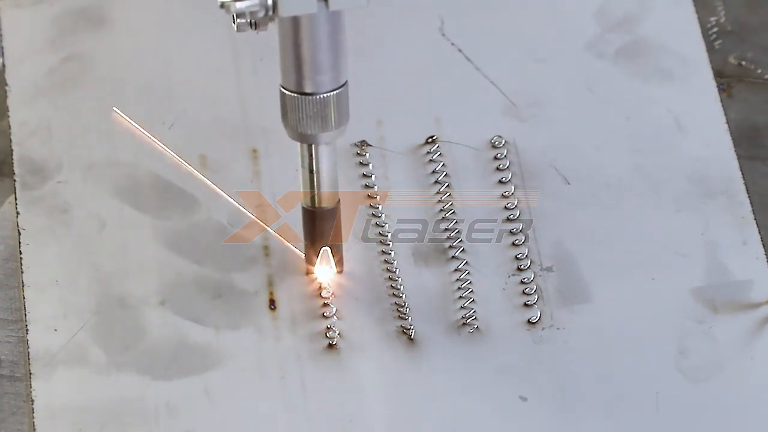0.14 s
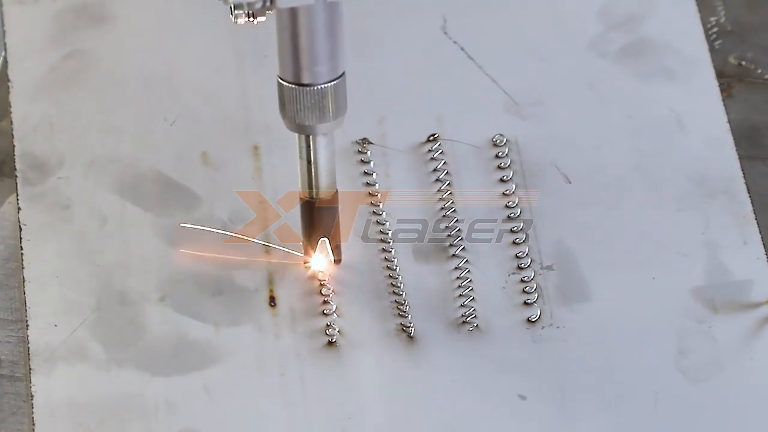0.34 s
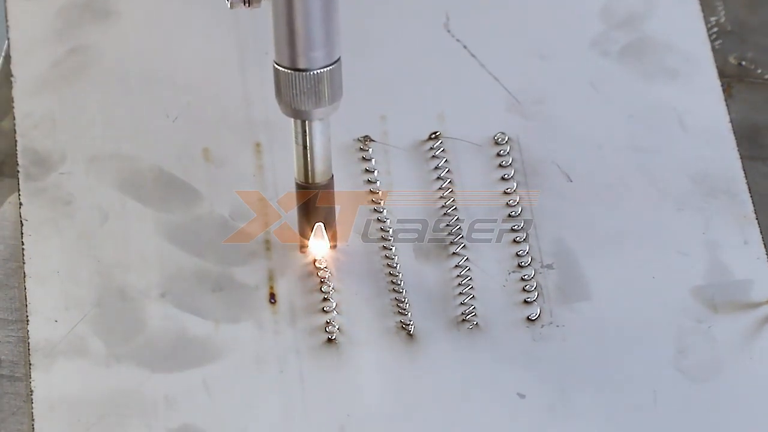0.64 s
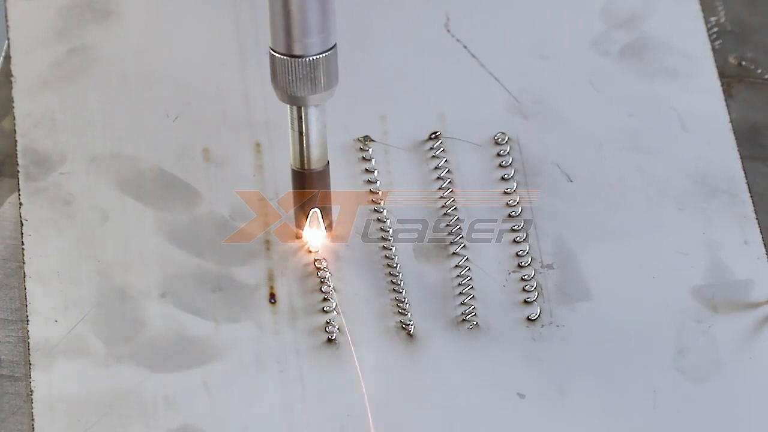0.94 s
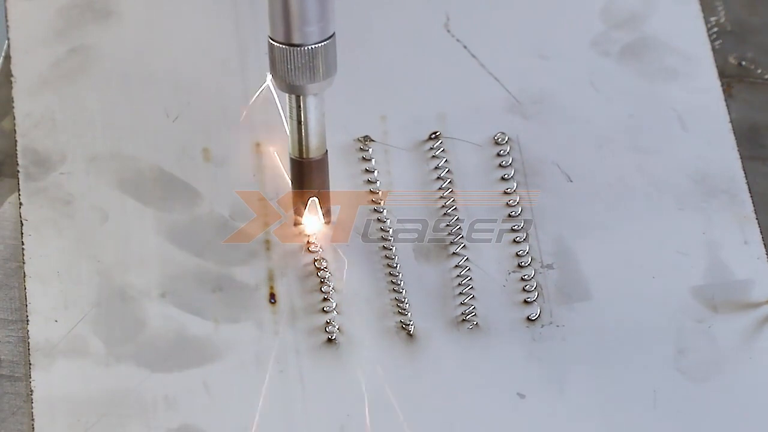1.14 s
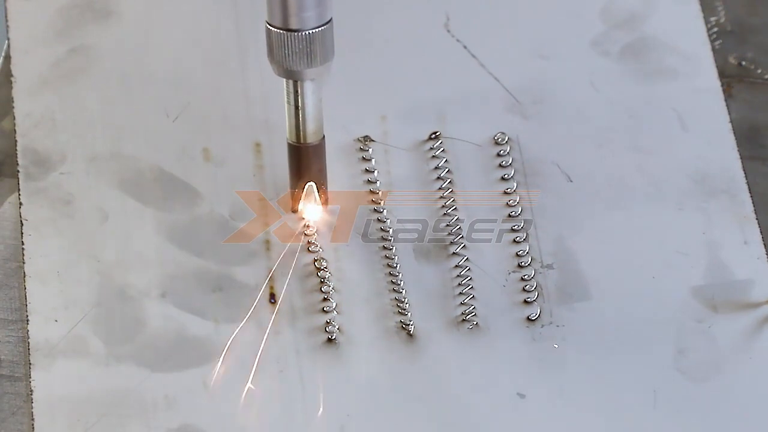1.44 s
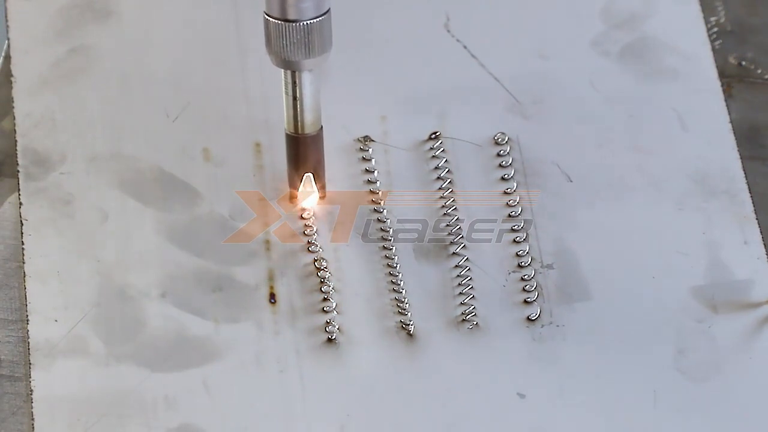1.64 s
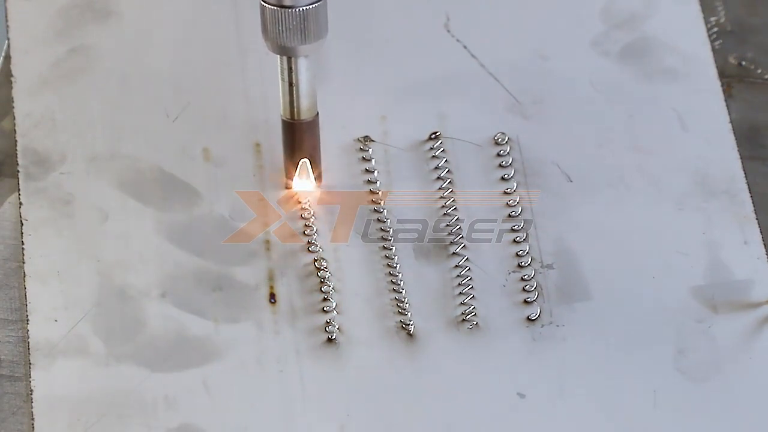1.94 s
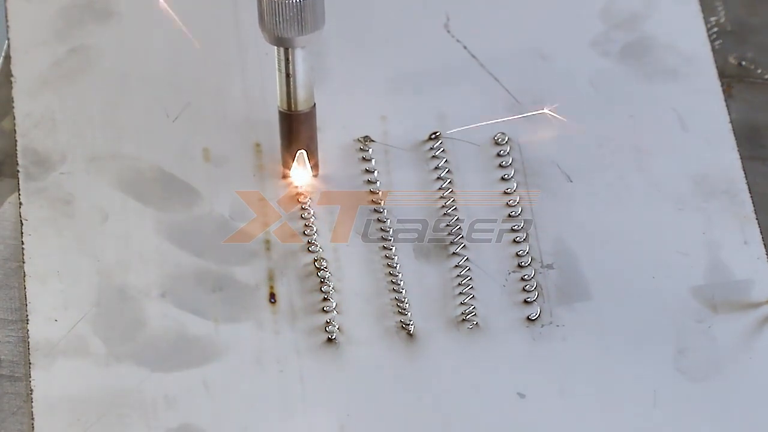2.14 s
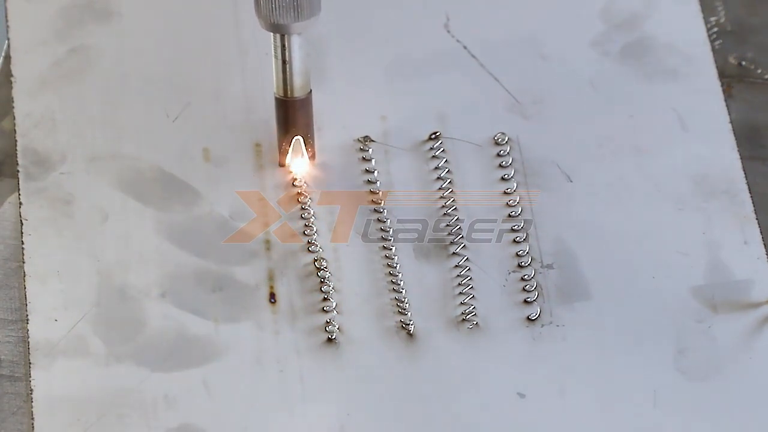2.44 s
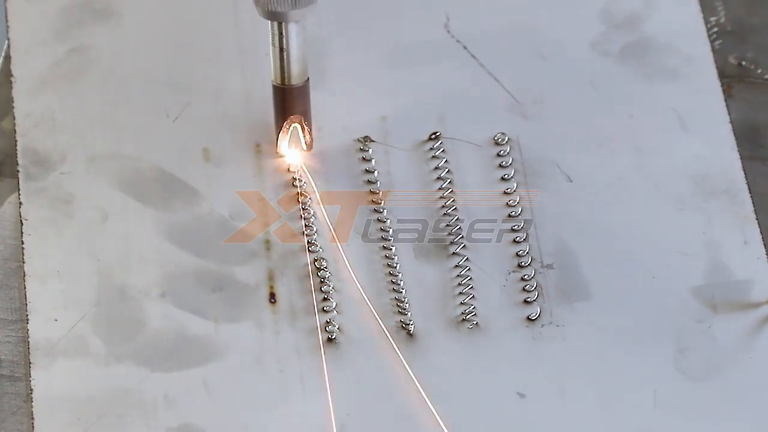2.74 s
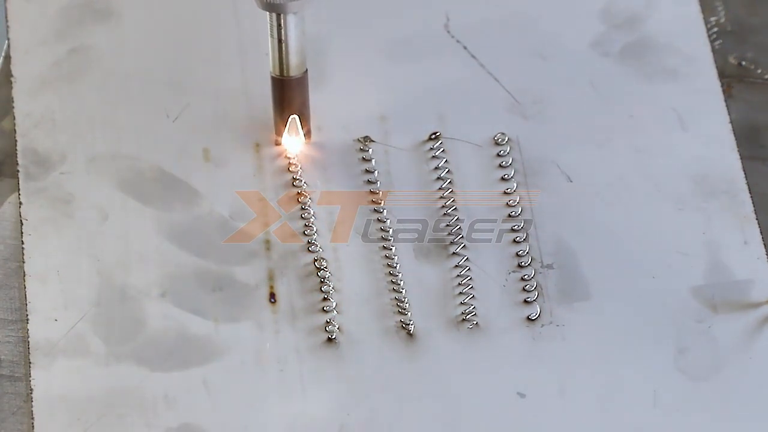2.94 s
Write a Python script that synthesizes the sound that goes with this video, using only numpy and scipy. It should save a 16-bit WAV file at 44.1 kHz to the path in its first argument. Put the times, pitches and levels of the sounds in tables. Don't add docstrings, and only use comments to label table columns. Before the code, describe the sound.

Laser welder hissing continuously close up, with tiny crackles over distant cooling fan rumble

```python
import sys
import numpy as np
from scipy import signal
from scipy.fft import rfft, irfft, next_fast_len
from scipy.io import wavfile
from scipy.ndimage import uniform_filter1d, map_coordinates

SR = 44100
rng = np.random.default_rng(int(sys.argv[2]) if len(sys.argv) > 2 else 0)


def store_wav(level_fs):
    pcm = np.round(np.clip(np.atleast_2d(level_fs), -1, 1) * 32767)
    wavfile.write(sys.argv[1], SR, pcm.T.astype(np.int16))


def decibels_to_gain(level_db):
    exponent = np.asarray(level_db, float) / 20
    return 10 ** exponent


N = 136710


def unit(x):
    return x / np.sqrt(np.mean(np.abs(x) ** 2) + 1e-20)


def along(points, hz):
    point_hz, value = np.transpose(points)
    return np.interp(np.log(hz + 1), np.log(point_hz + 1), value)


def wobble(rate):
    return map_coordinates(rng.standard_normal(200), [np.arange(N) * rate / SR])


def filtered(x, response):
    size = next_fast_len(N + SR // 4)
    spectrum = rfft(x, size) * response(np.fft.rfftfreq(size, 1 / SR))
    return irfft(spectrum, size)[..., :N]


def patchy_field(shape, bins, frames):
    field = uniform_filter1d(rng.standard_normal(shape), bins, 0)
    return unit(uniform_filter1d(field, frames, 1))


def rush(spectrum, alike, patchy_db):
    z = signal.stft(rng.standard_normal((2, N)), nperseg=512)[2]
    gain = decibels_to_gain(patchy_db * patchy_field(z.shape[1:], 6, 12))
    pair = signal.istft(z * gain, nperseg=512)[1][:, :N]

    def mid_side(hz):
        angle = np.arccos(np.clip(along(alike, hz), -1, 1)) / 2
        return decibels_to_gain(along(spectrum, hz)) * [np.cos(angle), np.sin(angle)]

    mid, side = filtered(pair, mid_side)
    return unit(np.array([mid + side, mid - side]))


# frequency_hz, level_db (per Hz)
FAN_AIR = [(13, -50), (22, -26), (69, -14.5), (102, -4), (225, -0.5), (367, -3.5), (399, -3.5), (610, -7.5),
           (1100, -18), (1430, -14), (2420, -120)]
# frequency_hz, likeness (0-1)
FAN_LIKENESS = [(50, .9), (200, 0.98), (500, 0.98), (900, 0.65)]
# frequency_hz, right_leads_rad
FAN_LEAD = [(50, .2), (300, 0.29), (700, 1), (1300, .4)]
# frequency_hz, left_over_right_db
FAN_TILT = [(30, 3), (150, 1.8), (400, 1.7), (800, -4)]
# pitch_hz, level_db (rms), wander_hz
FAN_TONES = [(47.5, -88, .3), (100, -81.5, .3), (111, -76.5, .5), (141, -75.5, .8), (164, -79, 1.5),
             (178, -79, 1.5), (228, -73.5, .7), (296, -77.5, 2.5), (345, -81.5, 2), (399.5, -75.5, .3),
             (466, -83, 1), (514, -82, 1), (560, -85, 1), (700, -85.5, 1)]


def fans():
    sound = decibels_to_gain(-63.5) * rush(FAN_AIR, FAN_LIKENESS, patchy_db=1.0)
    for pitch_hz, level_db, wander_hz in FAN_TONES:
        level = decibels_to_gain(level_db + 0.8 * wobble(4.72)) * np.sqrt(2)
        phase = 2 * np.pi * np.cumsum(pitch_hz + wander_hz * wobble(4.5)) / SR
        sound = sound + level * np.sin(phase)

    def both_ports(hz):
        left = decibels_to_gain(along(FAN_TILT, hz) / 2) * np.exp(-0.5j * along(FAN_LEAD, hz))
        return np.array([left, 1 / left])

    return filtered(sound, both_ports)


# start_hz, end_hz, width_hz, start_db, end_db
SHEET_DIPS = [
    (12300, 12000, 220, -1, -5),
    (14950, 14200, 220, -4, -4),
    (10300, 9900, 250, -3, -3),
    (7750, 7800, 200, -2, -2.5),
]


def walls(x):
    hz, t, z = signal.stft(x, SR, nperseg=2048)
    gain_db = 1.9 * patchy_field(z.shape[1:], 3, 16)
    travel = t / t[-1]
    for start_hz, end_hz, width_hz, start_db, end_db in SHEET_DIPS:
        centre_hz = start_hz + (end_hz - start_hz) * travel
        depth_db = start_db + (end_db - start_db) * travel
        gain_db = gain_db + depth_db * np.exp(-((hz[:, None] - centre_hz) / width_hz) ** 2)
    return signal.istft(z * decibels_to_gain(gain_db), SR, nperseg=2048)[1][:, :N]


def sputter():
    rate, centre_hz, cycles = 200, 5500, 1
    level_db, spread_db = -3.5, 3.5
    draw = rng.random((1000, 3))
    start = (np.cumsum(-np.log(draw[:, 0])) / rate * SR).astype(int)
    pitch_hz = centre_hz * np.exp(draw[:, 1:2] - 0.5)
    strength = decibels_to_gain(level_db - spread_db * np.log(np.maximum(draw[:, 2:], 1 / 20)))
    step = np.arange(64)
    t = step / SR
    cracks = strength * np.sin(2 * np.pi * pitch_hz * t) * np.exp(-t * pitch_hz / cycles)
    return np.bincount((start[:, None] + step).ravel(), cracks.ravel(), N)[:N]


# frequency_hz, level_db (per Hz)
JET_SPECTRUM = [(500, -20.5), (1000, -14), (2500, -7), (5000, -4.5), (7000, 0.5), (10000, -5), (12000, -5),
                (15500, -12)]
# frequency_hz, likeness (0-1)
JET_LIKENESS = [(800, 0.33), (1500, 0.36), (2300, 0.3), (2800, .98), (3900, 0.17), (4600, 0.91),
                (5200, 0.81), (7000, 0.5), (10000, 0.4), (15000, .6)]


def jet():
    return decibels_to_gain(-1.5) * rush(JET_SPECTRUM, JET_LIKENESS, patchy_db=1.5)


# centre_hz, width_hz
TUBE_RESONANCES = [(1825, 230), (2120, 200), (3200, 230), (3600, 250), (4400, 450), (5550, 400),
                   (6115, 185), (7310, 220), (8290, 280), (9420, 500), (10980, 450), (12740, 400),
                   (13850, 500), (15250, 500)]
TUBE_REACH = [(-14, -13.5, -13.5, -14, -11.5), (-18, -23, -23.5, -20, -18.5),
              (-10.5, -10, -10.5, -10, -12.5), (-29, -18, -25, -20, -20), (-11.5, -10, -8, -7.5, -9),
              (-29, -13.5, -22, -18, -12.5), (-10, -7.5, -3.5, -5.5, -8), (-9.5, -6.5, -10.5, -7.5, -4.5),
              (-6.5, -8, -9.5, -9.5, -9), (-8, -11, -10.5, -11, -7.5), (-19, -14, -11.5, -11, -11),
              (-21, -18, -22, -15, -17), (-20, -20, -19, -21, -16), (-25, -31, -21, -20, -21)]
REACH_STOPS = [0, .25, .5, .7, 1]
# left_over_right_db at start, middle, end; reflected_share (0-1)
TUBE_AIM = [(-1, -2, -1, 0), (-2, -3, -9, 0.4), (-1, 1.5, -2.5, 0.2), (-6, -6, -13, .2),
            (-11, -4.5, -0.5, 0), (-.2, 9, 5, 0.1), (4.5, 2, -2, 0.01), (13, 4, -2.5, 0.05),
            (-11.5, -12, -10.5, 0.12), (-1, 1.5, 1, 0.54), (-9, -1.5, 2, 0.13), (-3, -11, .5, 0.2),
            (-3, 3, -.3, .15), (-2, 12, 3, 0.3)]
TUBE_LEAD = [(-0.11, -0.17, -0.3), (0.66, 2.3, -0.23), (0.25, -0.35, 0.96), (-0.21, -0.2, 0.48),
             (-.3, -0.62, -0.74), (.02, 2.3, 0.17), (0.64, 0.55, 0.76), (0.48, 1.93, 1.9), (1.5, 1.2, 0.2),
             (-1.9, -0.9, -0.74), (1.4, 1.3, 0.76), (.5, -0.56, .02), (1, 0.23, .02), (-0.14, 0.15, .02)]


def tube():
    steepness = 1.154
    hz = np.fft.fftfreq(N, 1 / SR)
    progress = np.arange(N) / N
    thirds = [0, 0.5, 1]
    out = np.zeros((2, N))
    for (centre_hz, width_hz), level_db, aim, lead in zip(TUBE_RESONANCES, TUBE_REACH, TUBE_AIM, TUBE_LEAD):
        *pan_db, reflected = aim
        shape = (hz > 0) * (1 + (2 * (hz - centre_hz) / width_hz) ** 2) ** (-steepness / 2)
        noise = rng.standard_normal((2, N)) + 1j * rng.standard_normal((2, N))
        direct, echo = unit(np.fft.ifft(noise * shape)) * np.sqrt(2)
        angle = np.arccos(np.clip(1 - reflected, 0, 1)) / 2
        direct, echo = np.cos(angle) * direct, np.sin(angle) * echo
        left = decibels_to_gain(np.interp(progress, thirds, pan_db) / 2)
        left = left * np.exp(-0.5j * np.interp(progress, thirds, lead))
        level = decibels_to_gain(np.interp(progress, REACH_STOPS, level_db) + 1.1 * wobble(16))
        out[0] += level * (left * (direct + echo)).real
        out[1] += level * ((direct - echo) / left).real
    return out


# time_s, level_db
GAS_FLOW = [
    (0.0, -45.5),
    (0.01, -46),
    (2.77, -46),
    (3.1, -46.5),
]


def nozzle():
    time_s, level_db = np.transpose(GAS_FLOW)
    flow = decibels_to_gain(np.interp(np.arange(N) / SR, time_s, level_db) + 0.35 * wobble(18))
    return flow * (jet() + tube() + sputter())


def scene():
    return fans() + walls(nozzle())


def band_limit(x):
    return signal.sosfilt(signal.butter(12, 15530, fs=SR, output="sos"), x)


def record(dry):
    mic = filtered(dry, lambda hz: (hz < 15560) / np.sqrt(1 + (39 / (hz + 1)) ** 8))
    return band_limit(mic)


dry = scene()
out = record(dry)
store_wav(out)
```